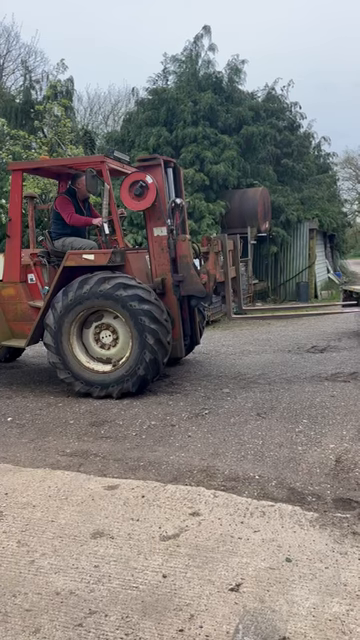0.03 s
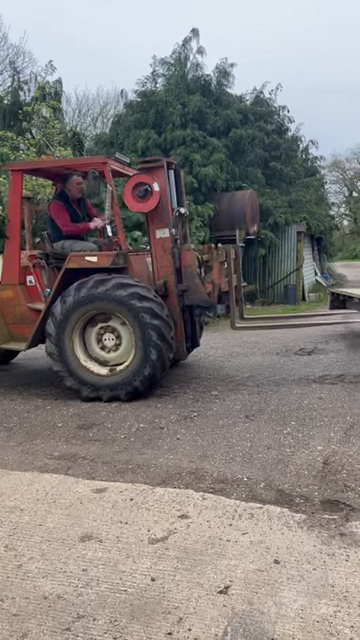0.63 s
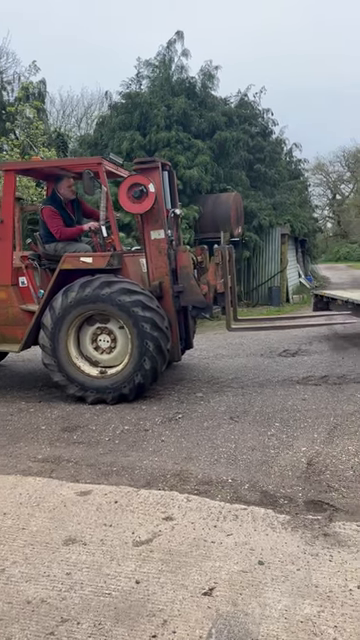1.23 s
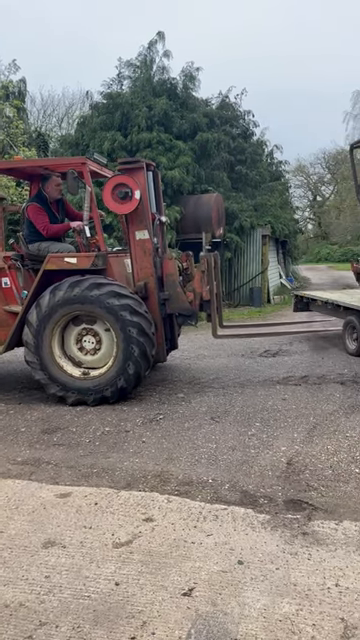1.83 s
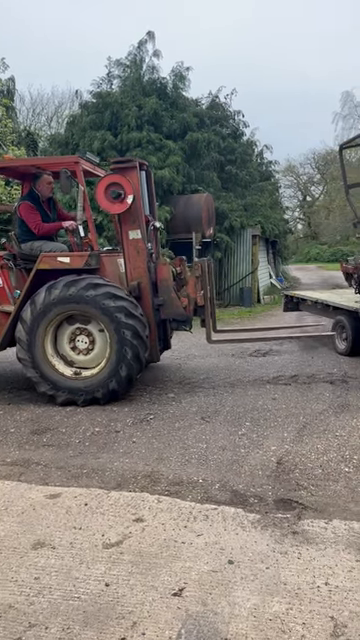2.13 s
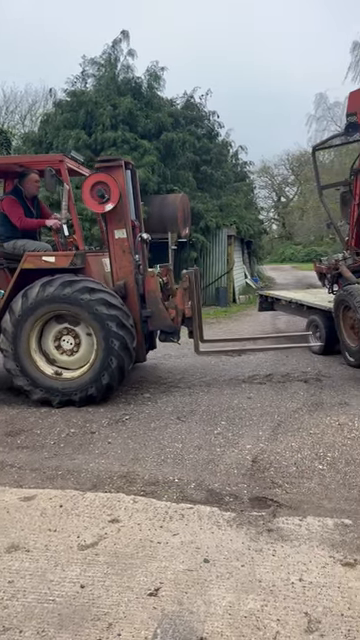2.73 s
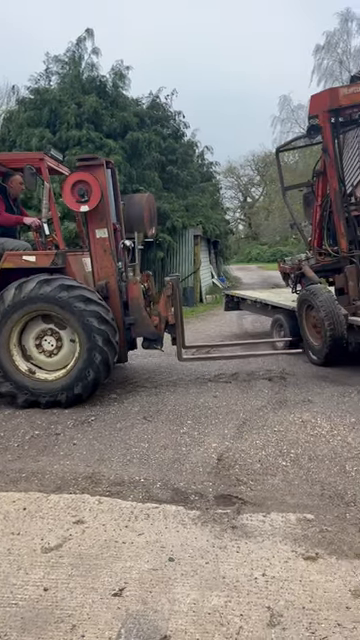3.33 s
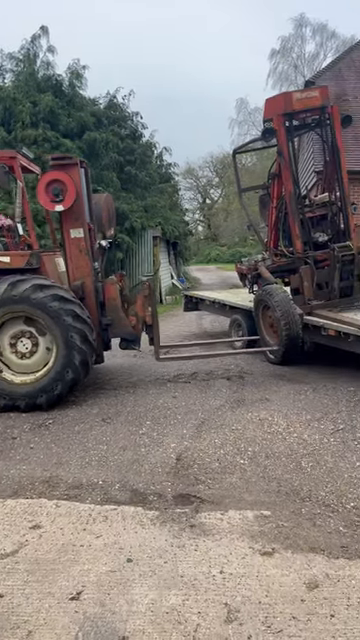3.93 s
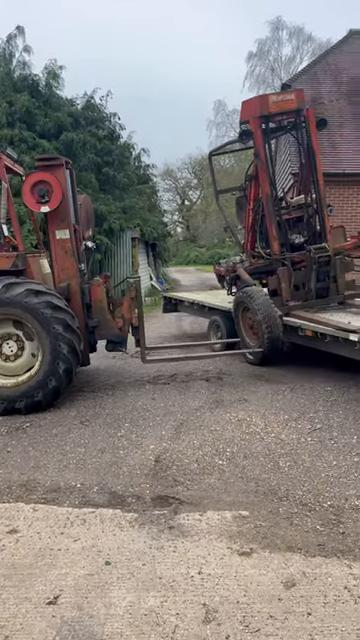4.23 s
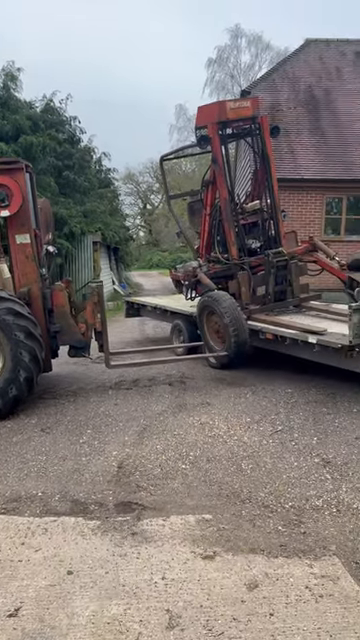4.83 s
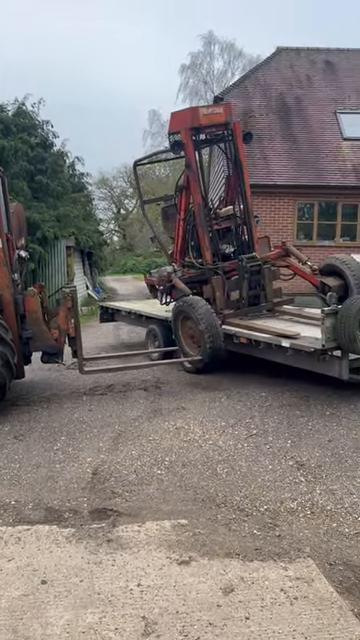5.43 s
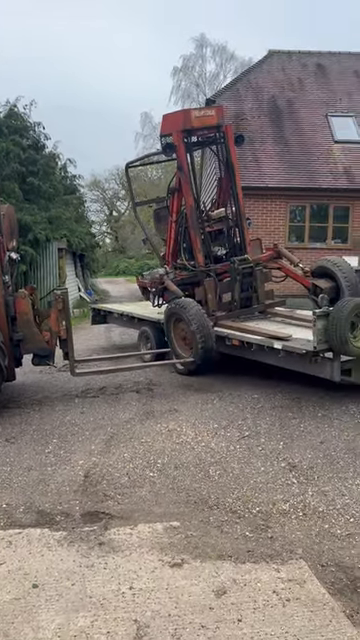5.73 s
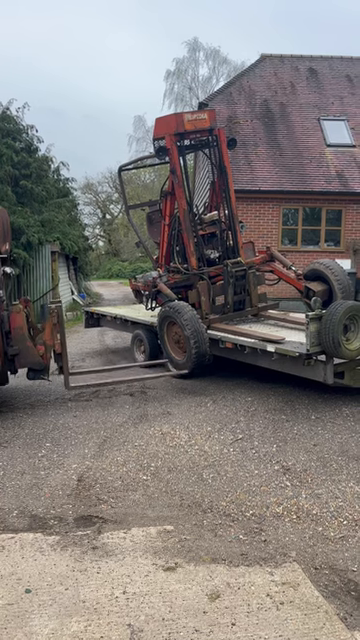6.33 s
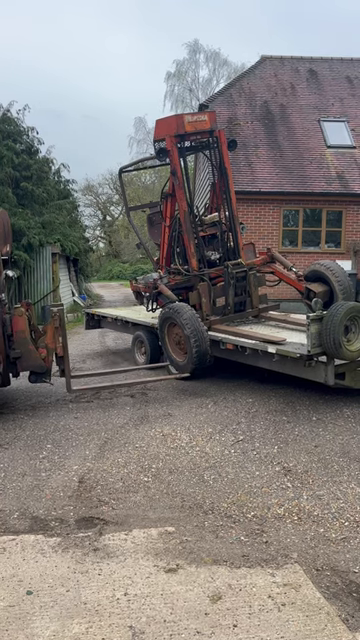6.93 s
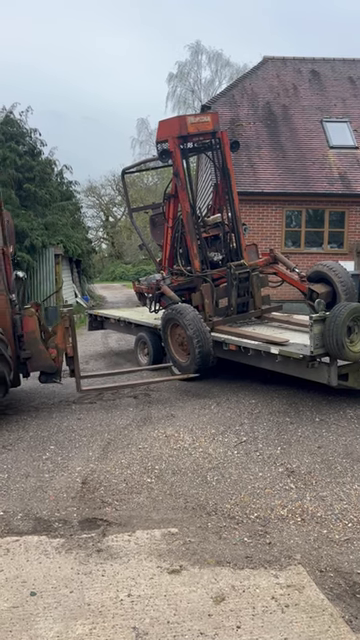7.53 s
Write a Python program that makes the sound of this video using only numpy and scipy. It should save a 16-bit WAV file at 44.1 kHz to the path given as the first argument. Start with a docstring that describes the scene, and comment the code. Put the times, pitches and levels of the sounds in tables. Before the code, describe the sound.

An old diesel forklift runs a few metres away in a yard, with a booming exhaust, rattling metal and a pulsing hiss. It eases off and revs again, with brief faint hydraulic whines, then holds steady. Past the middle it sinks almost to a stall in slow, knocking chugs, idles, and pulls hard back up to speed. The sound is in stereo with a slight outdoor echo.

```python
"""An old four-cylinder diesel forklift creeps across a gravel yard, a few metres away.
It eases off, revs again, sinks almost to a stall, idles, then pulls hard. Each firing of a cylinder
gives a boom in the exhaust, a knock and piston slaps in the engine block, and a puff of hiss.
The casing buzzes, valves rattle, covers and fuel pipes ring, hard knocks stand out and a fan throbs.
Speed and fuel make the engine louder. The hydraulics whine briefly and hiss as the forks come down."""
import sys
import numpy as np
from scipy import signal
from scipy.fft import rfft, irfft, next_fast_len
from scipy.io import wavfile
from scipy.ndimage import uniform_filter1d

SR = 44100
rng = np.random.default_rng(int(sys.argv[2]) if len(sys.argv) > 2 else 0)


def waveform_to_disk(signal):
    """Save audio, clipped to [-1, 1], as 16-bit WAV at the path in sys.argv[1]."""
    frames = np.transpose(np.atleast_2d(signal))
    scaled = np.clip(frames, -1, 1) * 32767
    samples = np.round(scaled).astype(np.int16)
    wavfile.write(sys.argv[1], SR, samples)


N = 339129
T = np.arange(N) / SR
CYLINDERS, WORKING_SPEED = 4, 36  # speed is always in firings per second


# How strongly the exhaust pipe passes each pitch: pitch_hz, level_db
EXHAUST_PIPE = [(18, -42), (28, -40), (38, -26), (50, -21), (60, -13), (68, -13), (78, -18), (92, -20),
                (112, -40), (140, -15), (158, -17.5), (180, -30), (230, -30.5), (290, -40.5), (400, -36.5)]
# The boom's four tones, at 1 to 4 times the firing rate: level_db
BOOM_TONES = [-5.5, 3, 4.5, -5]
# The boom sags as the throttle is eased: time_s, level_db
BOOM_LEVEL = [(0, -0.5), (.66, -5), (.78, -2), (.93, 2), (1.0, -1), (1.08, -2), (1.12, -3), (1.17, -14),
              (1.2, 1.5), (1.33, -2.5), (1.65, 0.5), (2.0, -3), (2.5, -0.5), (3.0, -4), (3.7, -4),
              (4.2, -2), (4.4, -2.5), (4.92, -1.5), (5.05, -1), (5.3, 3), (5.6, -0.5), (6.0, -1.5),
              (6.5, -5), (7.0, -2), (7.48, -1.5), (7.62, -10)]
# The engine bay favours the fan's note at working speed: pitch_hz, level_db
FAN_BOOST = [(120, -9), (140, 1.5), (160, -1)]

def exhaust_and_fan(firings, speed, load):
    """Tones of the firing rate boom in the pipe; the fan runs just above the fourth and throbs with it."""
    turns = firings + .35 - .021 * speed
    angle = 2 * np.pi * (turns + .001 * wander(hz=12))
    boom = sum(amp(db + at_pitch(EXHAUST_PIPE, k * speed)) * np.cos(k * angle)
               for k, db in enumerate(BOOM_TONES, 1))
    drone = sum(amp(at_pitch(EXHAUST_PIPE, k * speed)) * np.cos(k * angle + 2 * np.pi * rng.random())
                for k in range(5, 13))
    uneven = 1 + .2 * wander(hz=15)
    pipe = amp(over_time(BOOM_LEVEL)) * boom + amp(-7) * drone * uneven
    blades_per_firing = 4.0828 + .0019 * (speed - WORKING_SPEED)
    turns_ahead = np.cumsum((blades_per_firing - 4) * speed) / SR - .43
    fan = amp(at_pitch(FAN_BOOST, blades_per_firing * speed)) * np.cos(4 * angle + 2 * np.pi * turns_ahead)
    return (engine_gain(speed, load, base_db=-2.3, doubling_db=17.4, load_db=10.6) * pipe
            + engine_gain(speed, load, base_db=-22, doubling_db=11, load_db=.8) * fan)


# How hard each cylinder knocks: level_db
CYLINDER_LEVELS = [-0.5, -3.5, -5, -2]
# The piston's two slaps after each knock: delay_firings, level_db
PISTON_SLAPS = [(.2, -6.5), (.55, -11)]
# The tone of the knock: pitch_hz, level_db
KNOCK_TONE = [(100, -10), (420, -7.5), (650, -1), (950, 4.5), (1350, 0), (1900, -3), (2500, -2),
              (3900, -20), (5200, -31), (8000, -43), (16000, -63)]
# The notes of the metal panels: pitch_hz, width_hz, level_db
PANEL_NOTES = [(490, 50, -7), (865, 45, 3), (965, 70, -4), (1590, 90, -13), (2350, 200, -9)]

def knock(ignitions, load):
    """Burning fuel cracks against the block and the piston slaps after it; under load the panels ring."""
    cracks, all_blows = 0, 0
    for k, db in enumerate(CYLINDER_LEVELS):
        blows = amp(db) * taps((ignitions - k) / CYLINDERS, scatter_db=1, jitter_s=.00012)
        slaps = sum(amp(slap_db) * taps((ignitions - delay - k) / CYLINDERS, scatter_db=2, jitter_s=.0003)
                    for delay, slap_db in PISTON_SLAPS)
        cracks += strikes(blows, decay_s=.008, fresh=.37) + strikes(slaps, decay_s=.011, fresh=.39)
        all_blows += blows
    t = T[:4000]
    panel = sum((-1) ** k * amp(db) * np.exp(-np.pi * width * t) * np.sin(2 * np.pi * hz * t)
                for k, (hz, width, db) in enumerate(PANEL_NOTES))
    ring = unit(signal.oaconvolve(all_blows, panel)[:N])
    return steady(unit(covers(colour(cracks, KNOCK_TONE))) + amp(7.5) * load ** 5 * ring)


# The tone of the engine block and panels: pitch_hz, level_db
BLOCK_TONE = [(40, -26), (110, 7), (200, 0), (320, 1), (410, -1), (480, -3), (700, 0), (860, -2),
              (1230, -6.5), (1900, -7), (2450, -13.5), (3900, -17.5), (5000, -20.5), (9000, -97),
              (16000, -65)]

def valve_rattle(firings, count=20):
    """Valves, injectors and gear teeth tick at the same points in every round of four firings."""
    ticks = 0
    for k, (shift, strength) in enumerate(rng.random((count, 2))):
        blows = taps(firings / CYLINDERS - (k + shift) / count, scatter_db=3, jitter_s=.00003)
        ticks += amp(5 * strength) * strikes(blows, decay_s=.01, fresh=.22)
    return steady(colour(ticks, BLOCK_TONE))


# The notes of the engine covers: pitch_hz, width_hz, level_db
COVER_NOTES = [(542, 24, -10), (855, 15, -0.5), (1078, 13, -3), (1211, 19, 3.5), (1333, 31, -0.5),
               (1590, 36, -6), (2410, 56, -3), (3255, 120, -1), (4730, 220, 2.5)]

def covers(shaking):
    """The covers ring along with whatever shakes them."""
    return shaking + sum(amp(db) * resonate(shaking, hz, width) for hz, width, db in COVER_NOTES)


def clatter(firings, ignitions, speed, load):
    """Knock takes over from rattle as fuel is added or speed falls; slow blows sound duller."""
    slowness = 1 - speed / WORKING_SPEED
    knock_share = np.clip(.05 + .7 * load ** .6 + .043 * slowness, 0, .95)
    rattle = steady(covers(valve_rattle(firings)))
    blows = np.sqrt(knock_share) * knock(ignitions, load) + np.sqrt(1 - knock_share) * rattle
    near = yard_echo(blows, echo_db=-13, fade_s=.14)
    wash = np.array([noise(BLOCK_TONE) for ear in range(2)])  # comes back from all over the yard
    gain = engine_gain(speed, load, base_db=-26.5, doubling_db=9.2, load_db=11.55)
    sound = gain * (near + amp(-7.5) * wash)
    treble = signal.sosfiltfilt(signal.butter(2, 1330, "high", fs=SR, output="sos"), sound)
    return sound - .27 * slowness * treble


# The tone of the engine's hiss and the oil's hiss: pitch_hz, level_db
HISS_TONE = [(300, -12), (1500, 8.5), (2400, 11), (3200, 8.5), (4000, 6), (5000, 4), (6500, 5.5),
             (8200, 0.5), (10000, -7), (13000, -4), (14200, -8), (16000, -8)]

def engine_hiss(firings, ignitions, speed, load):
    """Hiss jumps up at each knock, holds for half a firing and swells to a puff, sharper under load."""
    since_knock = ignitions % 1
    jump = np.minimum(since_knock / .02, 1) / (1 + (since_knock / .47) ** 8)
    puff = np.exp((np.cos(2 * np.pi * (firings - .02)) - 1) / .36)
    swell_db = (2.8 + 12 * load ** 2.24) * (.6 * puff + .75 * jump)
    hiss = steady(noise(HISS_TONE) * amp(swell_db + 1.5 * wander(hz=150)))
    return engine_gain(speed, load, base_db=-36, doubling_db=8, load_db=13.7) * hiss


# The tones that stand out in the casing's buzz: times_firing_rate, level_db
BUZZ_TONES = [(1.5, -36), (1.75, -40), (2.5, -40), (3.75, -34), (4.25, -35), (4.5, -34), (5.5, -40),
              (5.75, -40), (6.5, -42), (7.5, -39), (9.5, -41), (11.75, -42), (13, -42), (14.25, -44),
              (14.5, -41), (15.25, -43), (16.25, -43), (17.25, -41), (18.25, -41), (19.25, -42),
              (20.25, -43), (23, -45), (26, -45), (31, -43), (34, -41)]

def casing_buzz(firings, speed, load):
    """Unequal cylinders shake the casing into many close tones, most of them faint."""
    turns = (firings + .001 * wander(hz=15))[::8]  # low tones need only every eighth sample
    strong, buzz = dict(BUZZ_TONES), 0
    for multiple in np.arange(1.5, 40, 1 / CYLINDERS):
        db = strong.get(multiple, -53 + 2 * rng.standard_normal())
        buzz += amp(db) * np.cos(2 * np.pi * (multiple * turns + rng.random()))
    buzz = signal.resample_poly(buzz, 8, 1)[:N]
    return engine_gain(speed, load, base_db=-1.5, doubling_db=15, load_db=5) * buzz


def silencer_bark(firings, speed, load, pitch_hz=494, width_hz=140):
    """Each exhaust stroke shakes the silencer's shell, which barks when the engine pulls hard."""
    blows = strikes(taps(firings, scatter_db=2.5, jitter_s=.00017), decay_s=.0077, fresh=.3)
    bark = steady(resonate(resonate(blows, pitch_hz, width_hz), pitch_hz, width_hz))
    return engine_gain(speed, load, base_db=-47, doubling_db=19, load_db=27) * bark


# Single hard engine knocks and cracks that stand out, with a few metallic clinks:
# start_s, level_db, pitch_hz, width_octaves, decay_s
HARD_KNOCKS = [(1.331, -19.5, 2000, 1.1, 0.0086), (1.368, -21, 1700, 1, 0.0097),
               (1.406, -26, 1400, 0.7, 0.011), (1.633, -27, 1190, 0.43, .008),
               (4.056, -21, 1280, 0.3, 0.0097), (4.142, -20, 1400, 0.9, .005),
               (4.171, -19, 1260, 0.25, .01), (4.711, -26, 1120, 0.071, 0.012),
               (5.254, -26, 1180, 0.98, 0.009), (5.317, -28, 1170, 1, 0.033), (5.441, -16, 1500, 1, 0.017),
               (5.503, -23.5, 1610, 0.83, 0.026), (5.556, -21.5, 885, 0.41, 0.024),
               (5.756, -28, 1070, 0.21, 0.018), (5.956, -27, 1080, 0.45, .012),
               (6.307, -26, 1340, 0.7, 0.014), (6.404, -23.5, 960, 0.67, .012),
               (6.454, -18, 1800, 0.74, 0.011), (6.504, -23, 1400, 1, .012),
               (6.545, -20, 1040, 0.46, 0.022), (6.726, -21, 1100, 1.3, .007), (6.788, -26, 900, 1.2, .007),
               (6.758, -18, 880, 0.15, 0.011), (6.816, -12.5, 900, 0.14, .009)]

def hard_knocks(size=6000):
    """Each hard knock is a short burst of noise around one pitch; the narrow ones clink."""
    out, hz = np.zeros(N + size), np.fft.rfftfreq(size, 1 / SR)
    for start_s, db, pitch_hz, octaves, decay_s in HARD_KNOCKS:
        peak = 1 / (1 + (np.log2((hz + 1) / pitch_hz) / octaves) ** 4)
        tone = peak / (1 + (hz / pitch_hz / 2) ** 2)
        fade = np.exp(-T[:size] / decay_s)
        burst = unit(irfft(rfft(rng.standard_normal(size)) * tone, size) * fade)
        out[round(start_s * SR):][:size] += amp(db) * np.sqrt(np.mean(fade ** 2)) * burst
    return out[:N]


# The notes of the fuel pipes: pitch_hz, width_hz, level_db
FUEL_PIPE_NOTES = [(1097, 26, 3), (1596, 60, -5), (2554, 310, 0), (5260, 810, -13)]

def fuel_pipes(ignitions):
    """Thin pipes ring with each stroke of the fuel pump, heard once the engine is slow."""
    ticks = strikes(taps(ignitions, scatter_db=7.5, jitter_s=.0002), decay_s=.03, fresh=.82)
    ring = sum(amp(db) * resonate(resonate(ticks, hz, width), hz, width)
               for hz, width, db in FUEL_PIPE_NOTES)
    return amp(-38) * steady(ring)


# Whines of the hydraulic pump (a negative fall rises): start_s, end_s, pitch_hz, fall_hz_per_s, level_db
PUMP_WHINES = [(0.65, 0.99, 286, 42, -30), (1.27, 1.68, 233, -38, -30), (5.76, 6.36, 231, 0, -39)]

def pump_whine():
    """The pump whines briefly as the hydraulics take up oil."""
    out = np.zeros(N)
    for start_s, end_s, pitch_hz, fall, db in PUMP_WHINES:
        glide_hz = pitch_hz - fall * np.clip(T - start_s, 0, end_s - start_s)
        hz = glide_hz * (1 + .01 * wander(hz=40))
        out += amp(db) * oil_flow(start_s, end_s) * np.sin(2 * np.pi * np.cumsum(hz) / SR)
    return out


def lowering_hiss():
    """Oil hisses evenly through a valve as the forks come down."""
    return amp(-46) * oil_flow(start_s=5.87, end_s=9) * noise(HISS_TONE)


def oil_flow(start_s, end_s, fade_s=.06):
    """Oil starts to flow, holds and stops."""
    return np.clip(np.minimum(T - start_s, end_s - T) / fade_s, 0, 1)


# The tone of the cab's drumming: pitch_hz, level_db
CAB_TONE = [(25, -33), (60, 10.5), (160, -8), (230, 2), (310, -12), (420, -19), (1500, -40), (16000, -80)]

def cab_drumming():
    """The cab and mudguards drum softly at any speed."""
    return amp(-34.5) * noise(CAB_TONE)


def yard_echo(x, echo_db, fade_s, size=16000):
    """Adds sound bounced off walls and a trailer, different in each ear."""
    tails = rng.standard_normal((2, size)) * amp(-60 * T[:size] / fade_s)
    tails /= np.linalg.norm(tails[0])
    return x + amp(echo_db) * signal.oaconvolve(x[None], tails, axes=1)[:, :N]


def engine_gain(speed, load, base_db, doubling_db, load_db):
    """base_db at working speed, plus doubling_db each time speed doubles, plus load_db at full load."""
    return amp(base_db + doubling_db * np.log2(speed / WORKING_SPEED) + load_db * load ** 1.73)


def taps(cycles, scatter_db, jitter_s):
    """One tap each time cycles passes a whole number, a little uneven in time and strength."""
    at = np.flatnonzero(np.diff(np.floor(cycles)) > 0)
    timing, strength = rng.standard_normal((400, 2))[:len(at)].T
    blows = np.zeros(N)
    blows[np.clip(at + (jitter_s * SR * timing).astype(int), 0, N - 1)] = amp(scatter_db * strength)
    return blows


def strikes(blows, decay_s, fresh, size=3000):
    """Blows on one spot of metal ring alike, apart from a share (fresh) that is new noise each time."""
    fade = np.exp(-T[:size] / decay_s)
    alike = signal.oaconvolve(blows, rng.standard_normal(size) * fade)[:N]
    energy = signal.lfilter([1], [1, -fade[1] ** 2], blows ** 2)
    new = rng.standard_normal(N) * np.sqrt(energy + 1e-12)
    return np.sqrt(1 - fresh) * alike + np.sqrt(fresh) * new


def resonate(x, hz, width_hz):
    """Lets through a band around one pitch; a narrow band rings longer."""
    return signal.lfilter(*signal.iirpeak(hz, hz / width_hz, SR), x)


def colour(x, tone):
    """Shapes a sound's lows and highs by a tone table, at an average level of 1."""
    size = next_fast_len(N + 8192)
    gain = amp(at_pitch(tone, np.fft.rfftfreq(size, 1 / SR)))
    return unit(irfft(rfft(x, size) * gain, size)[:N])


def noise(tone):
    """Even noise shaped by a tone table."""
    return colour(rng.standard_normal(N), tone)


def wander(hz):
    """A smooth random wobble, up to about the given rate."""
    return unit(irfft(rfft(rng.standard_normal(N)) / (1 + (np.fft.rfftfreq(N, 1 / SR) / hz) ** 4), N))


def steady(x, size=7000):
    """Evens out slow changes of level and keeps the throb."""
    power = uniform_filter1d(uniform_filter1d(x ** 2, size), size)
    return x / np.sqrt(abs(power) + 1e-12)


def at_pitch(table, hz):
    """Reads a table's level at any pitch."""
    pitches, levels = np.transpose(table)
    return np.interp(np.log(hz + 1), np.log(pitches + 1), levels)


def over_time(table):
    """Joins a table's points into a curve over time."""
    return np.interp(T, *np.transpose(table))


def amp(db):
    """Turns decibels into a gain."""
    return 10 ** (np.asarray(db) / 20)


def unit(x):
    """Scales to an average (rms) level of 1."""
    return x / np.sqrt(np.mean(x ** 2) + 1e-20)


# How fast the engine runs: time_s, firings_per_s
ENGINE_SPEED = [(0.0, 30.0), (0.22, 36.54), (0.65, 33.48), (0.74, 29.71), (0.92, 29.84), (1.17, 24.9),
                (1.41, 27.48), (1.55, 32.98), (1.71, 34.95), (2.55, 39.63), (3.14, 35.97), (3.48, 36.15),
                (4.29, 34.02), (4.69, 23.59), (5.22, 14.38), (5.36, 14.76), (5.65, 20.78), (5.97, 19.8),
                (6.46, 20.11), (6.88, 38.12), (7.42, 38.91), (7.69, 34.35)]
# How much fuel each firing gets: time_s, load_0_to_1
ENGINE_LOAD = [(0, 0.55), (.55, 0.08), (.8, 0.37), (1.0, 0.02), (1.15, 0.25), (1.19, 0.44), (1.29, 0.35),
               (1.34, 0.55), (1.45, 0.71), (1.8, 0.37), (2.85, 0.33), (3.6, 0.34), (4.22, 0.37), (4.35, 0),
               (4.65, 0.05), (4.98, 0.31), (5.47, 0.83), (5.85, 0.47), (6.42, 0.39), (6.48, 0.93),
               (6.8, 0.86), (6.92, 0.51), (7.45, 0.3), (7.6, 0)]
# Fuel goes in earlier at speed, which shifts the knock at no load: firings_per_s, delay_firings
KNOCK_DELAY = [(20, 0.0601), (36, -0.0499)]
# The level of the engine bay as the forklift rolls past: time_s, level_db
PASSING_LEVEL = [(0, 2), (.65, -0.06), (1.2, 0.95), (2.35, 1.74), (2.8, -0.5), (4.2, 0.5), (4.45, 0),
                 (4.95, -2.5), (5.75, -3.5), (6.3, -0.5), (7.69, 0.5)]

def scene():
    """Speed and load drive the engine; the hydraulics and the cab sound beneath it."""
    speed = over_time(ENGINE_SPEED)
    load = over_time(ENGINE_LOAD)
    firings = np.cumsum(speed) / SR + .2  # a running count
    delay = np.interp(speed, *np.transpose(KNOCK_DELAY)) * (1 - load)
    ignitions = firings + .21 - delay  # a knock falls on each whole number
    block = clatter(firings, ignitions, speed, load)
    cab = cab_drumming()
    bright = engine_hiss(firings, ignitions, speed, load) + hard_knocks() + fuel_pipes(ignitions)
    bright = yard_echo(bright, echo_db=-22, fade_s=.019)
    buzz = casing_buzz(firings, speed, load) + silencer_bark(firings, speed, load)
    engine_bay = amp(over_time(PASSING_LEVEL)) * (block + buzz + bright)
    return exhaust_and_fan(firings, speed, load) + engine_bay + pump_whine() + lowering_hiss() + cab


# How much louder the left microphone is than the right: pitch_hz, level_db
LEFT_LOUDER = [(70, -1.7), (150, -3), (280, -5.5), (520, -4), (720, -1), (850, 4), (1300, 7), (1750, -0.5),
               (6000, -0.5), (12000, 1.5)]
# How far the wave at the left microphone is ahead of the right: pitch_hz, lead_radians
LEFT_AHEAD = [(0, 0), (200, 0), (780, 1.2), (1700, .4), (2550, 2.9), (3900, 1.6), (5200, 1.8), (5750, 3.0),
              (6200, 3.3), (7700, 6.1), (8800, 6.6), (9800, 9.2), (10800, 9.7), (11800, 12.3),
              (13200, 12.9), (14100, 15.4), (16000, 16)]

def record(dry, low_hz=28, high_hz=15900, start_s=.035):
    """Two microphones open after an instant of silence and lose the deepest and highest pitches."""
    size = next_fast_len(N + 8192)
    hz = np.fft.rfftfreq(size, 1 / SR)
    lead = np.interp(hz, *np.transpose(LEFT_AHEAD))
    left = amp(at_pitch(LEFT_LOUDER, hz) / 2) * np.exp(.5j * lead)
    low_cut = 1 / np.sqrt(1 + (low_hz / (hz + 1)) ** 8)
    pair = irfft(rfft(dry, size) * low_cut * np.array([left, 1 / left]), size)[:, :N] * (T > start_s)
    high_cut = signal.firwin(511, high_hz, window=("kaiser", 9), fs=SR)
    return signal.oaconvolve(pair, high_cut[None], "same")


dry = scene()
out = record(dry)
waveform_to_disk(out)
```